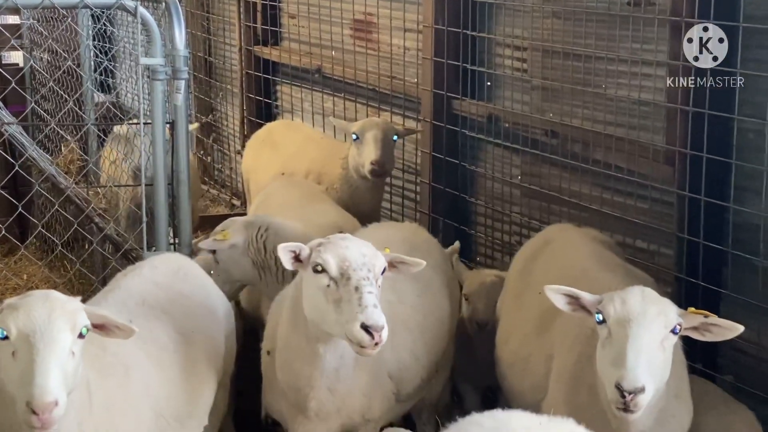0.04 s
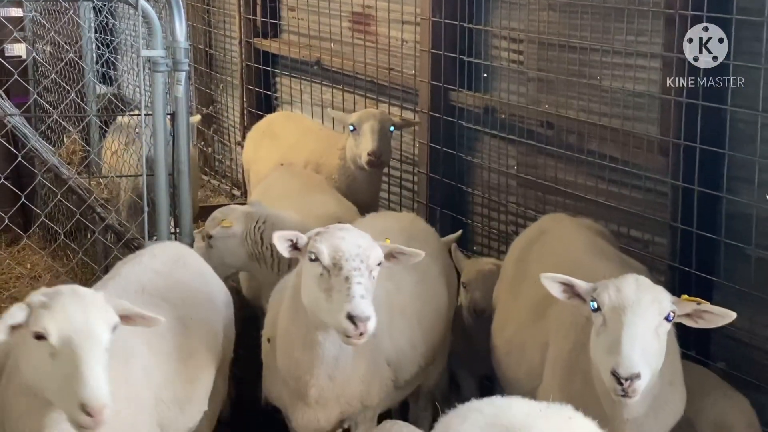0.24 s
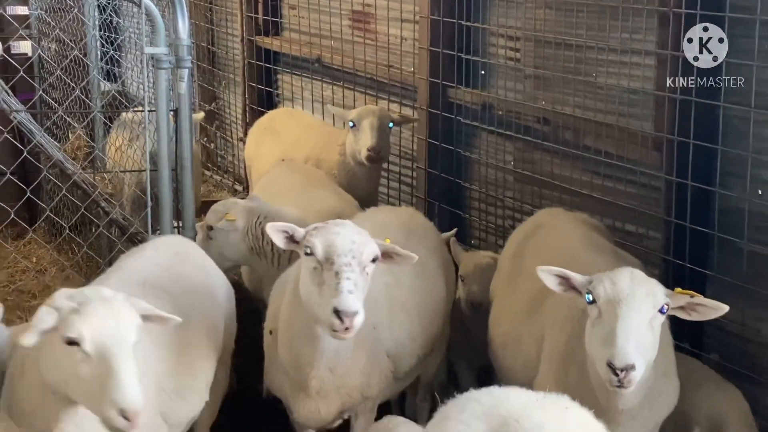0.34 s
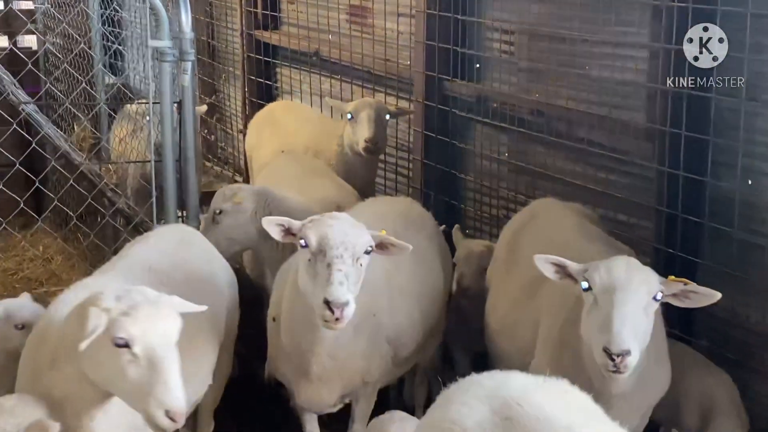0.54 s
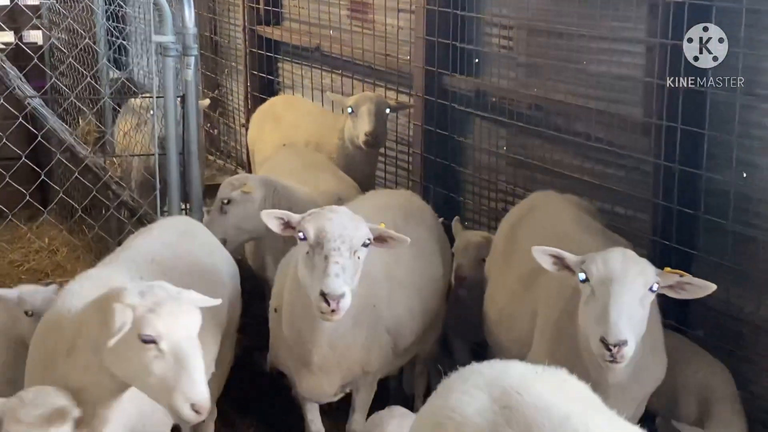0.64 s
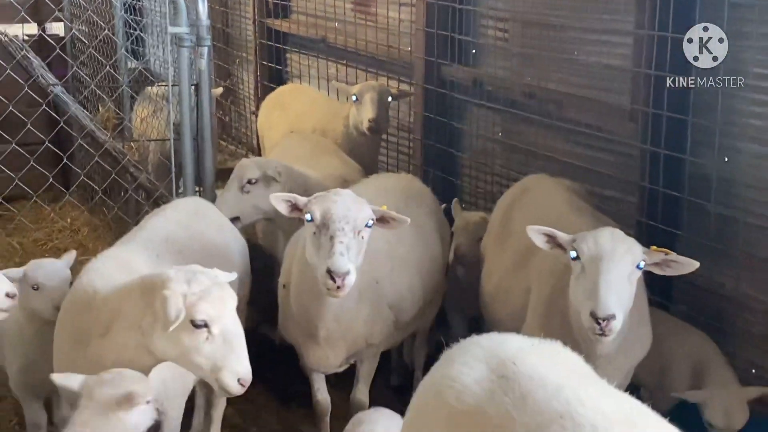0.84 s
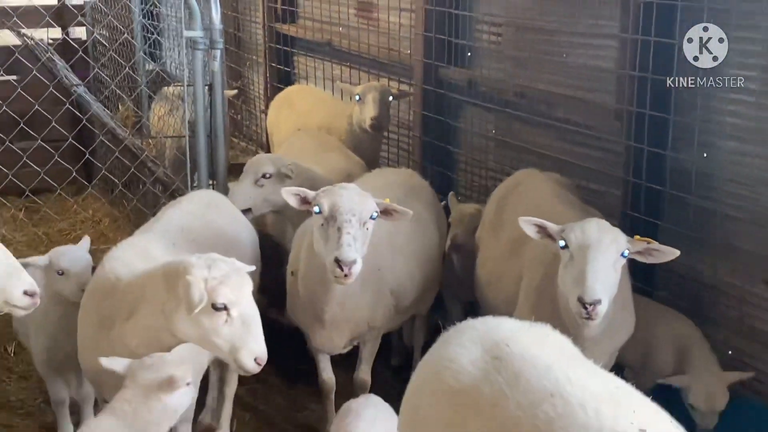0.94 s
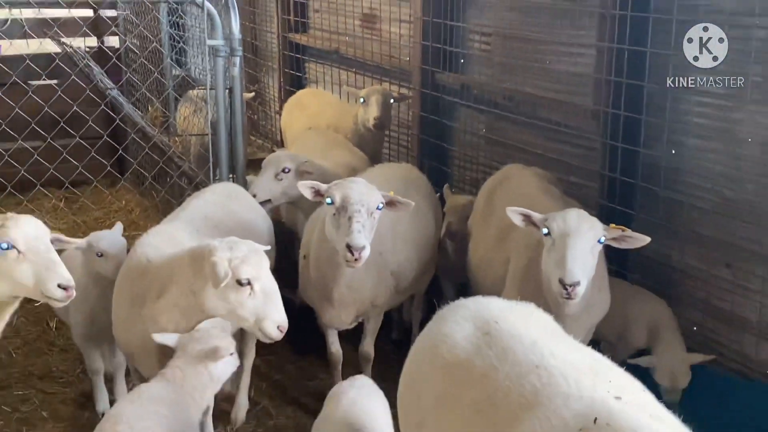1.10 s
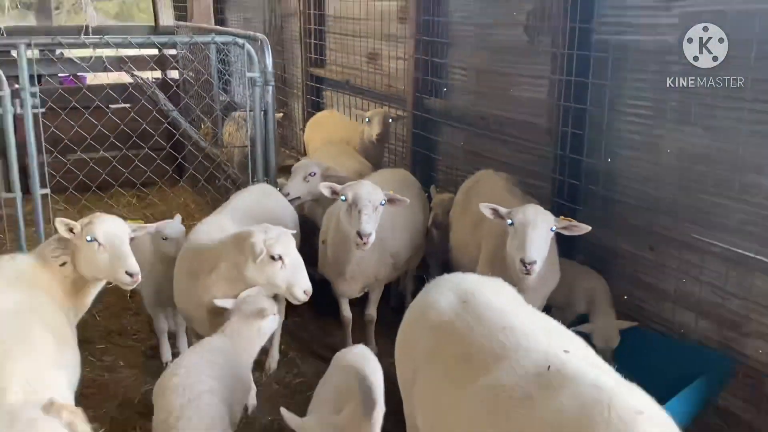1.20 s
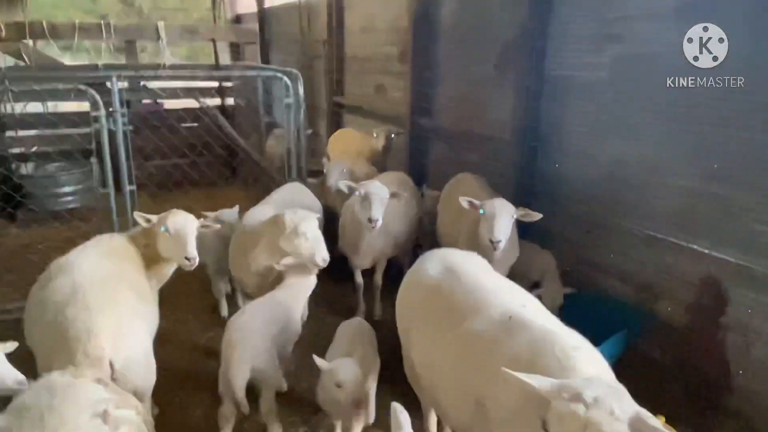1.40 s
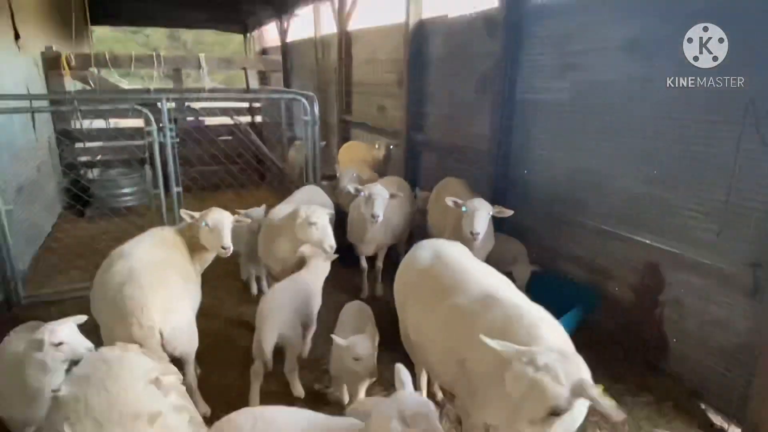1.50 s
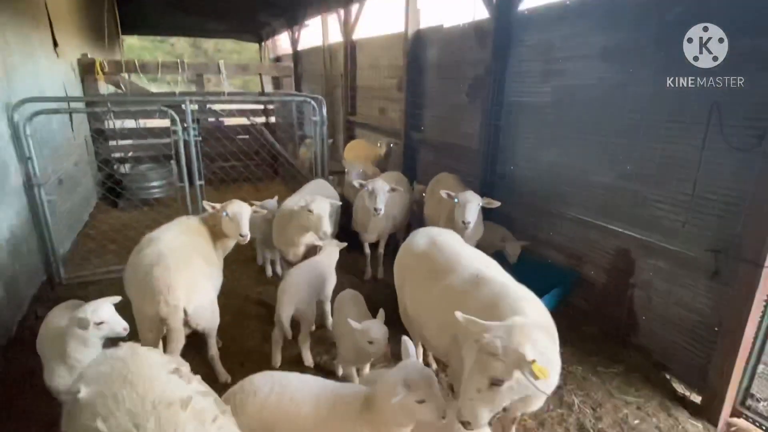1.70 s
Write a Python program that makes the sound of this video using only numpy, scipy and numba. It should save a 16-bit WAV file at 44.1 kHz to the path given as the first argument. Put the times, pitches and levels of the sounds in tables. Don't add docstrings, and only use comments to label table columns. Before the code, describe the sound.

A ewe's bleat dominates: after near quiet with a soft step and breath, it starts low at about 0.2 s, opens into a loud, nasal, raspy call throbbing about fifteen times a second, sags slightly in pitch and dies away around 1.05 s. Short barn reverberation, faint straw rustle and small wire or hoof ticks follow from 1.1 to 1.7 s. A dull double-hit wooden knock lands at 1.74 s.

```python
import sys
import numpy as np
from scipy import signal
from scipy.fft import rfft, irfft, next_fast_len
from scipy.io import wavfile
from scipy.ndimage import uniform_filter1d
from numba import njit

SR = 44100
rng = np.random.default_rng(int(sys.argv[2]) if len(sys.argv) > 2 else 0)


def nominal_scale(level):
    x = np.asarray(level, float) / 20
    return 10 ** x


def pcm_store(signal):
    levels = np.round(np.clip(np.atleast_2d(signal), -1, 1) * 32767)
    wavfile.write(sys.argv[1], SR, levels.astype(np.int16).T)


N = 77175

# frequency_hz, density_db (per Hz)
AIR_SPECTRUM = [(15, -47), (25, -2.5), (170, -5), (354, -16), (659, -14.5), (1520, -23.5), (2690, -25),
                (5730, -31), (16000, -28.5)]
# frequency_hz, correlation (-1 to 1)
EAR_LIKENESS = [(60, 0.63), (240, 0.12), (950, 0.015), (3770, 0.054), (15000, 0.05)]
# start_s, level_db
STIRRING = [(0, -66.5), (.15, -53), (.28, -48.5), (.36, -60), (.83, -62), (1.05, -56), (1.2, -65.5),
            (1.33, -68.5), (1.5, -60.5), (1.75, -68.5)]
# start_s, level_db
RUSTLE = [(0, -71), (.04, -77.5), (.12, -64), (1.1, -60.5), (1.22, -64), (1.32, -77.5), (1.44, -66),
          (1.53, -69.5), (1.62, -63), (1.75, -65.5)]
# start_s, level_db
STRAW_HISS = [(0, -72.5), (.14, -70.5), (.25, -70), (1.0, -64), (1.1, -76), (1.17, -66.5), (1.24, -69),
              (1.33, -82.5), (1.44, -69.5), (1.75, -68.5)]
# start_s, peak_db, frequency_hz, t60_s, left_minus_right_db
TICKS = [(0.131, -53, 890, .04, 0), (.137, -59, 9000, 0.034, 0), (0.212, -44.5, 1604, 0.019, 0),
         (1.1455, -45, 6890, 0.012, 3), (1.1452, -45.5, 10500, 0.03, 11), (1.1458, -46.5, 6000, 0.022, 0),
         (1.17, -53, 3800, .006, 2), (1.2117, -48, 5790, .006, -4), (1.22, -52, 6000, .01, 2),
         (1.398, -56, 13000, .02, 5.5), (1.434, -53.5, 9900, .02, -3.5), (1.456, -56, 1300, 0.0217, -4.5),
         (1.556, -59.5, 2140, .025, -5), (1.593, -57.5, 3180, 0.008, 3), (1.603, -49.5, 2310, 0.019, 8),
         (1.6055, -49, 2820, 0.019, 16), (1.608, -63, 3500, .015, 2.5), (1.6526, -56, 3200, .02, 11),
         (1.654, -61, 4540, .015, 1), (1.674, -49.5, 689, 0.031, 7)]
# centre_s, level_db, frequency_hz, half_length_s
THUDS = [(0.07, -51, 213, 0.014), (0.074, -64, 140, 0.026), (0.151, -35.5, 253, 0.0064),
         (0.172, -58, 101, 0.0059), (0.23, -43, 222.5, 0.025), (0.21, -51, 70, 0.021),
         (.24, -38, 149.2, 0.023), (1.037, -51.5, 75, 0.0152), (1.06, -49.5, 140, 0.015),
         (.63, -35.5, 1600, 0.027), (.978, -33, 1625, .018), (1.052, -65, 1630, 0.023),
         (1.049, -61, 2550, 0.036), (0.16, -48, 190, 0.041), (.31, -54.5, 90, 0.023),
         (1.187, -53.5, 327, 0.005), (1.5, -54.5, 170, 0.015), (1.58, -56, 190, 0.017)]
# centre_s, level_db, frequency_hz, half_length_s
PUFFS = [
    (0.088, -85, 1010, .025),
    (0.166, -48, 757, 0.028),
    (0.171, -53, 2200, 0.025),
    (0.18, -76, 3026, 0.016),
    (0.215, -49, 1240, 0.011),
    (0.657, -50.5, 388, 0.33),
    (1.222, -71.5, 5800, 0.031),
]
# start_s, level_db
KNOCK_BLOWS = [
    (1.7405, -33),
    (1.7425, 0),
    (1.747, -1),
]
# frequency_hz, level_db, t60_s
KNOCK_MODES = [(170, -38.5, 0.091), (363, -38.5, 0.075), (680, -44, 0.019), (980, -46, 0.026),
               (1300, -51, .02)]
# start_s, pitch_hz, level_db
THROBS = [(.238, 147.9, -3.5), (0.31, 152.5, -2), (0.372, 160.8, 0), (0.425, 161.3, 0.5), (0.49, 162.2, 0),
          (.553, 160.9, -1), (0.622, 160.6, -0.5), (0.688, 158.3, -2), (0.762, 157.7, 0.5),
          (0.835, 156.4, 1), (0.902, 153.4, 0), (0.97, 150.7, 2), (1.029, 139.8, -12),
          (1.095, 130.4, -37.5)]
# start_s, pitch_hz, level_db
LOOSE_VOICING = [
    (.2, 133, -80),
    (.225, 134, -46),
    (.29, 137, -42),
    (.345, 141, -47),
    (.38, 143, -80),
]
# multiple, level_db
LOOSE_PARTIALS = [(3, -6.5), (4, -0.5), (5, -3), (6, -7)]
# multiple, level_db, dip_db, growth_db_per_s, dip_growth_db_per_s
CHEST_PARTIALS = [(1, -42.5, 10, 0.5, 3), (2, -55.5, 7.5, -8.5, 20), (3, -47, 22, -4, 11.5),
                  (4, -38.5, 12, -5.5, 14.5), (5, -29, 25.5, 10, -1.5), (6, -37.5, 16, 38.5, 9)]
# start_s, first_hz, second_hz, third_hz, opening_db
MOUTH = [
    (.2, 657, 1680, 2400, -6),
    (.34, 728, 1671, 2510, 3),
    (.46, 740, 1728, 2490, 1),
    (.58, 750, 1769, 2470, 3.5),
    (.72, 730, 1727, 2456, 0.5),
    (.77, 713, 1656, 2520, -3.5),
    (.98, 660, 1649, 2574, -7),
    (1.1, 770, 1617, 2480, -0.5),
]
# width_hz, level_db
MOVING_FORMANTS = [(132, -6), (70, -2.5), (190, -6.5)]
# frequency_hz, width_hz, level_db, growth_db_per_s
STILL_FORMANTS = [(1065, 230, -24, -8.5), (1590, 180, -20.5, -12), (2290, 120, -16.5, -2.5),
                  (2947, 77, -12.5, -7), (3081, 130, -12.5, 4.5), (3500, 182, -20.5, 11.5),
                  (4675, 130, -24, 2.5), (6240, 160, -36, -12)]
# centre_s, frequency_hz, level_db, half_length_s
THROAT_RINGS = [(0.348, 723.1, -33, 0.031), (0.395, 746.6, -44, 0.0082), (0.453, 751, -32, 0.018),
                (0.517, 761, -26.5, 0.014), (0.581, 742, -28.5, 0.029), (0.651, 730, -24.5, 0.012),
                (.725, 734.4, -27, .018), (0.767, 717.1, -27.5, 0.01), (0.806, 740.4, -31, 0.014),
                (.868, 701.8, -30.5, 0.028), (0.926, 701.5, -29.5, 0.0186), (1.009, 701.3, -41, 0.017),
                (1.045, 739.7, -51.5, 0.019), (1.112, 720.7, -57.5, 0.019), (1.145, 719, -58.5, 0.0083)]
# frequency_hz, density_db (per Hz)
RASP_SPECTRUM = [(2350, -36), (4000, -2.5), (4660, -7), (5580, -9), (10600, -29.5), (12500, -28),
                 (16200, -62), (22000, -120)]

AIR_FLICKER_DB = 1.2
BARN_T60_S, BARN_DB, WALL_LOW_HZ, WALL_HIGH_HZ = 0.24, -6, 303, 1320
TICK_SNAP = 4.1
JITTER, SAG = 0.0035, 0.015
SHIMMER_DB, DIP_SHARPNESS = 2.5, 1.6
PULSE_DB, HISS_UNDER_DB, RASP_DB = -32, -1.5, -47.5
PULSE_DIP_DB, HISS_DIP_DB, RASP_DIP_DB = 9, -0.5, 6.5
GATE_DEPTH = 0.11
FREE_WOBBLE, SECOND_DB = 0.0074, -40
ONSET_S, ATTACK_S, CLEAR_S = 0.2073, 0.024, 0.12
LOCK_S, LOCK_RISE_S = 0.345, 0.024
BRIGHT_S = 0.278
RUMBLE_CUT_HZ, TOP_HZ = 39, 16500
SUM_GAP_HZ, DIFFERENCE_GAP_HZ = [13150, 13800], [10600, 11500]
SIDE_MIDS_DB, SIDE_HIGH_DB, SIDE_TOP_DB = -2, 8.5, 2


def rms_one(x):
    return x / np.sqrt(np.mean(x ** 2) + 1e-20)


def in_time(rows):
    s, *columns = np.transpose(rows)
    return [np.interp(np.arange(N) / SR, s, column) for column in columns]


def at_hz(points, hz):
    points = np.array(points)
    return np.interp(np.log(hz), np.log(points[:, 0]), points[:, 1])


def drift(rate_hz):
    step = 40
    r = np.exp(-2 * np.pi * rate_hz * step / SR)
    white = rng.standard_normal(N // step + 2002)
    slow = signal.lfilter([1], [1, -2 * r, r * r], white)[2000:]
    return np.interp(np.arange(N) / step, np.arange(len(slow)), rms_one(slow))


def butter(x, order, hz, kind):
    return signal.sosfilt(signal.butter(order, hz, kind, fs=SR, output="sos"), x)


def ring(x, hz, t60):
    r, w = nominal_scale(-60 / (t60 * SR)), 2 * np.pi * hz / SR
    return signal.lfilter([0, np.sin(w)], [1, -2 * r * np.cos(w), r * r], x + 1e-18)


@njit
def glide(x, c, r):
    y = np.zeros(len(x))
    for i in range(2, len(x)):
        y[i] = (1 - r * r) / 2 * (x[i] - x[i - 2]) + 2 * r * c[i] * y[i - 1] - r * r * y[i - 2]
    return y


def resonate(x, hz, width_hz):
    return glide(x, np.cos(2 * np.pi * hz / SR) * np.ones(N), np.exp(-np.pi * width_hz / SR))


def swell(centre_s, half_s):
    return np.exp(-((np.arange(N) / SR - centre_s) / half_s) ** 2)


def banded_noise(spectrum, patchy_db, low_hz, high_hz, alike=None):
    edges = np.geomspace(low_hz, high_hz, int(2 * np.log2(high_hz / low_hz)) + 2)
    white = rng.standard_normal((2, 2, N))
    together = drift(5.2)
    out = 0
    for k, (low, high) in enumerate(zip(edges, edges[1:])):
        mid, side = butter(white[k % 2], 2, [low, high], "band")
        hz = np.sqrt(low * high)
        c = np.clip(at_hz(EAR_LIKENESS, hz) if alike is None else alike, -1, 1)
        gain = nominal_scale(at_hz(spectrum, hz) + patchy_db * (0.69 * together + drift(29)))
        out = out + gain * (np.sqrt(1 + c) * mid + np.sqrt(1 - c) * side * [[1], [-1]])
    return rms_one(out)


def barn_air():
    low_db, = in_time(STIRRING)
    middle_db, = in_time(RUSTLE)
    fine_db, = in_time(STRAW_HISS)
    low = nominal_scale(low_db) * banded_noise(AIR_SPECTRUM, AIR_FLICKER_DB, 40, 330, alike=0.79)
    middle = nominal_scale(middle_db) * banded_noise(AIR_SPECTRUM, AIR_FLICKER_DB, 358, 5000)
    fine = nominal_scale(fine_db) * banded_noise(AIR_SPECTRUM, AIR_FLICKER_DB, 5000, 19000, alike=0.3)
    return low + middle + fine


def barn_echo(x):
    size = next_fast_len(N + SR)
    w = 2 * np.pi * np.arange(size // 2 + 1) / size
    spectrum = rfft(x, size)
    out = np.zeros((2, N))
    for k, lag in enumerate((rng.uniform(0.015, 0.045, 16) * SR).astype(int)):
        loop = nominal_scale(-60 * lag / SR / BARN_T60_S) * np.exp(-1j * w * lag)
        out[k % 2] += (-1) ** (k // 2) * irfft(spectrum * loop / (1 - loop), size)[:N]
    return butter(out, 1, [WALL_LOW_HZ, WALL_HIGH_HZ], "band")


def ticks():
    out, t = np.zeros((2, N)), np.arange(N) / SR
    for s, peak_db, hz, t60, pan_db in TICKS:
        snap = TICK_SNAP * (np.arange(N) == int(s * SR) + 1)
        decay = (t >= s) * nominal_scale(-60 * np.maximum(t - s, 0) / t60)
        burst = (rng.standard_normal(N) + snap) * decay
        tick = resonate(resonate(burst, hz, 0.4 * hz), hz, 0.5 * hz)
        out += nominal_scale(peak_db) * tick / np.abs(tick).max() * nominal_scale(pan_db * np.array([[0.5], [-0.5]]))
    return out


def thuds():
    t = np.arange(N) / SR
    return sum(nominal_scale(db) * np.sin(2 * np.pi * hz * (t - s)) * swell(s, half) for s, db, hz, half in THUDS)


def puffs():
    out = 0
    for s, db, hz, half in PUFFS:
        gust = resonate(resonate(rng.standard_normal(N), hz, 0.69 * hz), hz, 0.9 * hz)
        out = out + nominal_scale(db) * rms_one(gust) * swell(s, half)
    return out


def closing_knock():
    blow = sum(nominal_scale(db) * (np.arange(N) == int(s * SR)) for s, db in KNOCK_BLOWS)
    blow = butter(blow, 2, [90, 1300], "band")
    return sum(nominal_scale(db) * ring(blow, hz, t60) for hz, db, t60 in KNOCK_MODES)


def throat(source, moving_hz, open_db):
    t = np.arange(N) / SR
    voice = 0
    for k, (hz, (width, db)) in enumerate(zip(moving_hz, MOVING_FORMANTS)):
        gain = nominal_scale(db + open_db * (k > 0))
        voice = voice + (-1) ** k * gain * resonate(resonate(source, hz, width), hz, 6 * width)
    for k, (hz, width, db, grow_db) in enumerate(STILL_FORMANTS):
        gain = nominal_scale(db + grow_db * (t - 0.7214))
        voice = voice + (-1) ** k * gain * resonate(source, hz, width)
    return nominal_scale(21.5) * butter(voice, 2, 480, "high")


def chest_tone(turns, dip):
    t = np.arange(N) / SR
    out = 0
    for multiple, db, dip_db, grow_db, deepen_db in CHEST_PARTIALS:
        fall_db = np.maximum(dip_db + deepen_db * (t - 0.65), 0) * dip
        gain = np.sqrt(2) * nominal_scale(db + grow_db * (t - 1.1351) - fall_db + 2.07 * drift(30))
        start, rise = (ONSET_S, CLEAR_S) if multiple < 3 else (LOCK_S, LOCK_RISE_S)
        entry = np.clip((t - start) / rise, 0.05, 1) ** 2
        out = out + gain * np.sin(2 * np.pi * multiple * turns) * entry
    return out


def second_resonance(second_hz, open_db):
    turns = np.cumsum(second_hz * (1 + FREE_WOBBLE * drift(40))) / SR
    return nominal_scale(SECOND_DB + open_db + 3 * drift(32)) * np.sin(2 * np.pi * turns)


def throat_rings():
    turns = np.cumsum(in_time(THROAT_RINGS)[0] * (1 + 0.0028 * drift(22))) / SR
    envelope = sum(np.sqrt(2) * nominal_scale(db) * swell(s, half) for s, hz, db, half in THROAT_RINGS)
    return np.sin(2 * np.pi * turns) * envelope


def loose_voicing():
    hz, level_db = in_time(LOOSE_VOICING)
    turns = np.cumsum(hz * (1 + 0.0057 * drift(28))) / SR
    return sum(nominal_scale(level_db + db + 0.61 * drift(25)) * np.sin(2 * np.pi * multiple * turns)
               for multiple, db in LOOSE_PARTIALS)


def ewe():
    t = np.arange(N) / SR
    pitch_hz, level_db = in_time(THROBS)
    throb_count, = in_time([(row[0], k) for k, row in enumerate(THROBS)])
    dip = (0.5 - 0.5 * np.cos(2 * np.pi * throb_count)) ** DIP_SHARPNESS
    last_fall_db = 150 * np.maximum(t - THROBS[-1][0], 0)
    level = nominal_scale(level_db - last_fall_db) * np.clip((t - ONSET_S) / ATTACK_S, 0, 1)

    turns = np.cumsum(pitch_hz * (1 - SAG * dip + JITTER * drift(50))) / SR
    cycle = turns.astype(int)
    pulses = np.diff(cycle, prepend=0) * nominal_scale(SHIMMER_DB * rng.standard_normal(N)[cycle])
    gate = 1 - GATE_DEPTH + GATE_DEPTH * 2 * np.exp(-3 * (turns % 1))
    hiss = gate * rng.standard_normal(N)
    source = nominal_scale(PULSE_DB - PULSE_DIP_DB * dip) * rms_one(pulses)
    source = source + nominal_scale(PULSE_DB + HISS_UNDER_DB - HISS_DIP_DB * dip) * hiss

    *moving_hz, open_db = in_time(MOUTH)
    voice = throat(source, moving_hz, open_db)
    voice = voice + chest_tone(turns, dip) + second_resonance(moving_hz[1], open_db)
    rasp = gate * banded_noise(RASP_SPECTRUM, 2.2, 3800, 12500, alike=0.92)
    rasp = nominal_scale(RASP_DB - RASP_DIP_DB * dip + open_db * 0.56) * rasp
    brightening = np.clip((t - BRIGHT_S) / 0.013, 0.3, 1)
    return level * voice + throat_rings() + loose_voicing(), level * rasp * brightening


def scene():
    air = barn_air()
    small_sounds = ticks() + thuds() + puffs() + closing_knock()
    voice, rasp = ewe()
    near = voice * nominal_scale(np.array([[0.2], [-0.2]])) + rasp + small_sounds
    return near + nominal_scale(BARN_DB) * barn_echo(near.mean(axis=0)) + air


def band_limit(x):
    return signal.sosfilt(signal.butter(12, 15740, fs=SR, output="sos"), x)


def record(dry):
    dry = butter(dry, 1, RUMBLE_CUT_HZ, "high")
    mid, side = (dry[0] + dry[1]) / 2, (dry[0] - dry[1]) / 2
    low = butter(side, 3, 2000, "low")
    mids = butter(side, 3, [2000, 7600], "band")
    high = butter(side, 3, [7600, 11000], "band")
    top = butter(side, 3, 11000, "high")
    side = low + nominal_scale(SIDE_MIDS_DB) * mids + nominal_scale(SIDE_HIGH_DB) * high + nominal_scale(SIDE_TOP_DB) * top
    mid = signal.sosfilt(signal.cheby2(5, 45, SUM_GAP_HZ, "stop", fs=SR, output="sos"), mid)
    side = signal.sosfilt(signal.cheby2(5, 45, DIFFERENCE_GAP_HZ, "stop", fs=SR, output="sos"), side)

    loud_db = 10 * np.log10(uniform_filter1d(mid ** 2, 2048) + 1e-12)
    loud = np.clip((loud_db + 46) / 6, 0, 1)
    for hz, share in (([12400, 14500], 1), ([14500, 16400], 0.55)):
        band = signal.sosfiltfilt(signal.butter(8, hz, "band", fs=SR, output="sos"), mid)
        mid = mid - share * loud * band
    top_cut = signal.cheby2(12, 60, TOP_HZ, fs=SR, output="sos")
    mix = signal.sosfilt(top_cut, np.array([mid + side, mid - side]))
    return band_limit(mix)


dry = scene()
out = record(dry)
pcm_store(out)
```